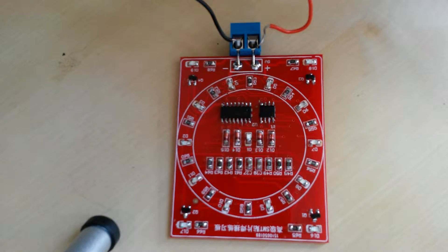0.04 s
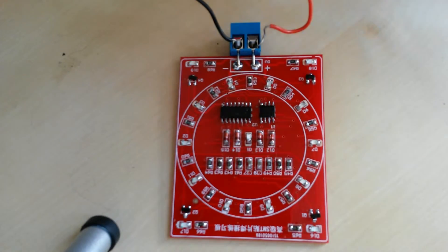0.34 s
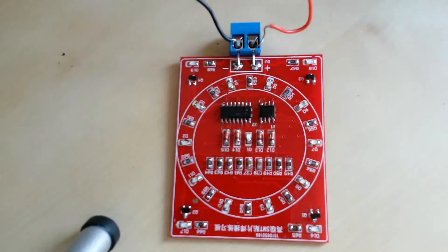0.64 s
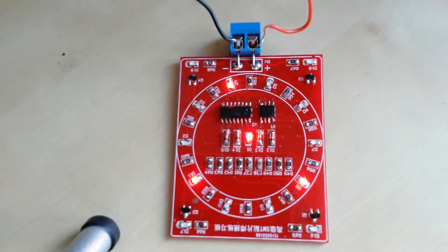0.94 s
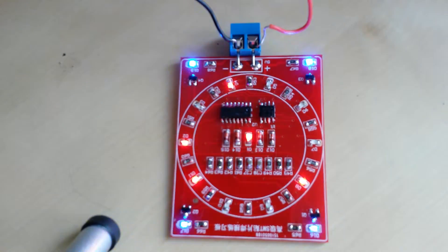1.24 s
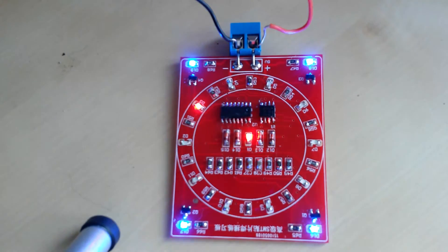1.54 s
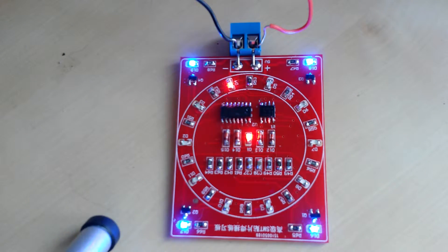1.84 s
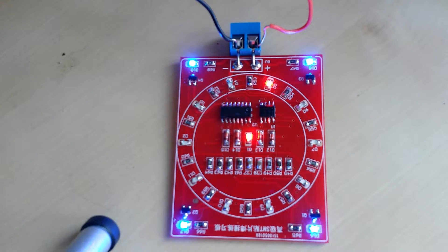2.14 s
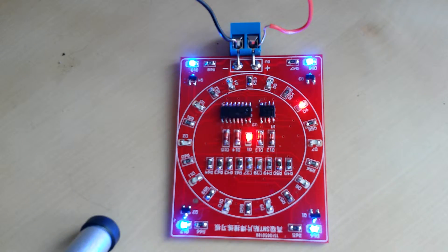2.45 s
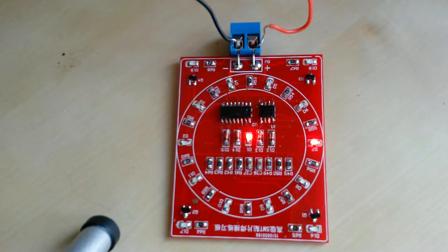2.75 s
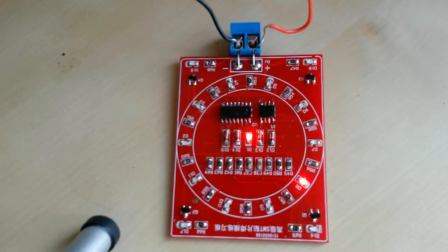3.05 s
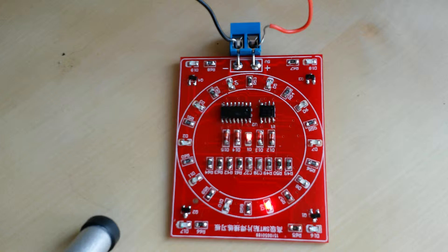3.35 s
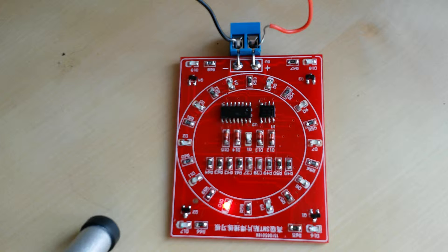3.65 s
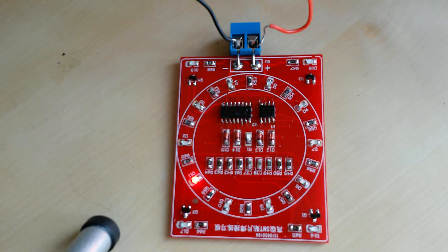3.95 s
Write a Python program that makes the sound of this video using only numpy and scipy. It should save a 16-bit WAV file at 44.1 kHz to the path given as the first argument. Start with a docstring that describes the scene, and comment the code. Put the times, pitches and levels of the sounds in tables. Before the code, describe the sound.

One sharp switch snap in a quiet room, then soft handling on a wooden desk.

```python
"""A wooden desk in a small quiet room. Close to the microphone a switch snaps loudly: its contacts
chatter, its housing rings and the room answers. Lighter clicks follow, soft bumps sound the desk's low
modes, and a hand or sleeve slides with a faint friction hiss and tiny ticks. Low mains hum and
microphone hiss lie beneath. The microphone rings near 7 kHz and overloads on the snap."""
import sys
import numpy as np
from scipy import signal
from scipy.fft import rfft, irfft
from scipy.io import wavfile

SR = 44100
rng = np.random.default_rng(int(sys.argv[2]) if len(sys.argv) > 2 else 0)


def store_pcm(level_fs):
    """Save levels as 16-bit WAV."""
    pcm = np.round(np.clip(level_fs, -1, 1) * 32767).astype(np.int16)
    wavfile.write(sys.argv[1], SR, np.atleast_2d(pcm).T)


N = 176400
TIME = np.arange(N) / SR
FREQS = np.maximum(np.arange(N // 2 + 1) * SR / N, 1)
SNAP_START_S = .0001

# Stereo image of every noise. Each row: frequency in Hz, left-right correlation.
STEREO_LIKENESS = [(60, 0), (280, .88), (650, 0.34), (1400, .3), (3000, 0.084), (15000, 0)]
# Room rumble and microphone hiss. Each row: frequency in Hz, relative level in dB.
ROOM_TONE_COLOUR = [(25, -0.5), (50, -2), (72, 3.5), (110, -7), (170, -8), (300, -14), (600, -16.5),
                    (1500, -20.5), (4500, -19), (6200, -19), (7400, -15.5), (9500, -21), (15000, -21)]
# Mains hum. Each row: frequency in Hz, rms level in dB before panning.
HUM_PARTIALS = [(100, -85.5), (200.3, -73.5), (300.4, -90), (400, -89)]
# Fader ride of the slide's hiss. Each row: time in seconds, level in dB before trim.
HISS_RIDE = [(.3, -71), (.5, -74), (.68, -69), (.98, -66), (1.17, -72), (1.38, -65), (1.52, -69),
             (1.59, -62.5), (1.7, -64.5), (1.85, -70), (1.94, -70), (2.05, -57.5), (2.14, -57),
             (2.25, -59.5), (2.54, -62), (2.66, -67.5), (2.82, -67), (3.15, -73), (4, -77)]
# Bright friction hiss. Each row: frequency in Hz, relative level in dB.
HISS_COLOUR = [(2000, -24), (4000, -16), (5800, -11.5), (6700, -5), (7400, 0), (8300, -5.5), (9600, -11),
               (12500, -13.5), (15000, -14.5)]
# The hiss leans left. Each row: frequency in Hz, left minus right in dB.
HISS_BALANCE = [(3000, 0.5), (7000, 0.5), (9000, 1.5), (14000, 3.5)]
# Fader ride of the rub. Each row: time in seconds, level in dB before trim.
RUB_RIDE = [(.75, -81.5), (1.36, -72.5), (1.48, -76.5), (1.6, -66), (1.7, -70), (1.92, -80), (2.24, -71),
            (2.55, -76), (2.77, -71.5), (3.15, -80.5), (4, -81.5)]
# Dull body of the slide. Each row: frequency in Hz, relative level in dB.
DULL_RUB_COLOUR = [(100, -8.5), (300, -3), (560, 0.5), (760, -7), (1050, -3), (1600, -9), (2300, -6.5),
                   (4000, -15)]
# The hand drags on the desk. Each row: time in seconds, level in dB.
DRAG_RIDE = [(2.5, -89), (2.58, -68.5), (2.72, -71.5), (2.77, -65.5), (2.82, -64.5), (2.89, -82)]
# Rumble of that drag. Each row: frequency in Hz, relative level in dB.
DRAG_RUMBLE_COLOUR = [(30, -13.5), (70, 0.5), (140, -2), (250, -13), (600, -24.5), (2000, -44.5),
                      (8000, -71)]
# Tiny catches in the slide. Each row: start in seconds, strike level in dB.
TICK_CUES = [(2.0169, -35.5), (2.0454, -31), (2.0503, -39), (2.0538, -35), (2.1265, -38), (2.281, -46)]
# Ping of a tick. Each row: frequency in Hz, gain in dB, 60 dB decay time in seconds.
TICK_RING = [(7900, -6, .003), (12500, -5, .0008)]
# Sizzle after a tick. Each row: frequency in Hz, relative level in dB.
TICK_TAIL_COLOUR = [(1000, -36), (4000, -28), (6000, -26), (7600, 7), (9500, 6), (15000, -20)]
# Soft bumps on the desk. Each row: start in seconds, push level in dB, contact time in seconds.
BUMP_CUES = [(0.641, -56, 0.0029), (0.65, -46, 0.0032), (2.008, -58.5, 0.0035), (2.031, -68, 0.015),
             (2.775, -55.5, 0.0045), (2.804, -59, 0.011), (3.356, -66, .008)]
# Low modes of the desk. Each row: frequency in Hz, gain in dB, 60 dB decay time in seconds.
DESK_RING = [(74.4, 5, 0.32), (104, -11, 0.19), (132.5, -1.5, 0.154), (155, -10.5, 0.26), (267, -3, 0.21),
             (376, 1, 0.27)]
# Lighter clicks. Each row: start in seconds, body level in dB, edge level in dB,
# 60 dB decay time in seconds, strike level of the ring in dB.
CLICK_CUES = [(.589, -59.5, -52.5, 0.095, -59.5), (1.302, -60, -74, 0.016, -79),
              (3.078, -64, -78, .025, -76)]
# Hollow body of a click. Each row: frequency in Hz, relative level in dB.
CLICK_BODY_COLOUR = [(150, 1), (400, 2), (580, 2), (820, -2), (1000, -7), (1600, -15), (2050, -7),
                     (2500, -22), (5000, -29), (15000, -43)]
# What a click sets ringing. Each row: frequency in Hz, gain in dB, 60 dB decay time in seconds.
CLICK_RING = [(397, -5.5, 0.75), (578, 0.5, 0.066), (680, -10, 0.45), (787, -7, 0.14), (2013, -12, 0.26)]
# The room's answer to the snap. Each row: frequency in Hz, relative level in dB.
REVERB_COLOUR = [(35, -34.5), (60, -19), (100, -28), (155, -17), (220, -29), (380, -19), (450, -27),
                 (640, -14), (820, -30.5), (1800, -27), (2750, -11.5), (3400, -14), (4300, -11.5),
                 (6100, -8.5), (7050, 3), (7900, -3.5), (9500, -13), (12500, -21), (15000, -29)]
# How fast the room dies away. Each row: frequency in Hz, 60 dB decay time in seconds.
REVERB_DECAY = [(100, 0.34), (300, .33), (700, .22), (1800, .22), (3000, 0.3), (7000, 0.2), (13000, .19)]
# Crack of the switch, also the clicks' edge. Each row: frequency in Hz, relative level in dB.
CRACK_COLOUR = [(40, -20), (100, -33), (250, -31.5), (380, -23.5), (630, -17), (920, -26), (1350, -18.5),
                (1750, -31), (2800, -20), (3900, -14), (5000, -12), (6200, -10), (7400, -1.5), (8600, -5.5),
                (10100, -15.5), (15000, -26)]
# Switch and housing modes. Each row: frequency in Hz, gain in dB, 60 dB decay time in seconds.
SWITCH_RING = [(158, -44.5, 0.29), (314, -42, 0.047), (387, -49, .3), (554, -28, .035), (606, -21, 0.046),
               (658, -26, 0.087), (2890, -40.5, .21), (3984, -33.5, .15), (5403, -34.5, .16),
               (6700, -32, 0.26), (7104, -27.5, .27), (7020, -29, 0.22), (10200, -40, .14),
               (12540, -42.5, 0.16)]
# The two capsules ring at different pitches. Each row: frequency in Hz, left minus right in dB.
CAPSULE_BALANCE = [(2500, 0.5), (5200, -1), (6200, -3), (6850, -4), (7450, -0.5), (8300, 5.5), (9400, 1),
                   (14000, 0)]


def from_db(db):
    """Decibels to gain."""
    return 10 ** (np.asarray(db) / 20)


def rms_one(x):
    """Scale to an rms of one."""
    return x / np.sqrt(np.mean(x ** 2) + 1e-20)


def at_hz(points, hz):
    """Read a table on a log-frequency axis."""
    freqs, values = np.transpose(points)
    return np.interp(np.log(hz), np.log(freqs), values)


def in_time(ride):
    """Read a fader ride at every sample."""
    return np.interp(TIME, *np.transpose(ride))


def pan(db):
    """Stereo gains for left minus right in dB: one value, or one per frequency."""
    return from_db(db * np.array([[.5], [-.5]]))


def drift(rate_hz):
    """Slow random wander, rms one."""
    return rms_one(irfft(rfft(rng.standard_normal(N)) / (1 + (FREQS / rate_hz) ** 2), N))


def ripple(spread_db, spacing_hz):
    """Random peaks and dips over frequency, as reflections make them; the bass stays even."""
    peaks = np.interp(FREQS / spacing_hz, np.arange(2000), rng.standard_normal(2000))
    return from_db(spread_db * np.minimum(FREQS / 1500, 1) * peaks)


def noise(colour):
    """Coloured stereo noise, rms one: narrow in the low mids, wide in the treble."""
    mid, side = rfft(rng.standard_normal((2, N)))
    alike = at_hz(STEREO_LIKENESS, FREQS)
    stereo = np.sqrt(1 + alike) * mid + np.sqrt(1 - alike) * side * [[1], [-1]]
    near_reflections = ripple(spread_db=3, spacing_hz=90.7)
    return rms_one(irfft(stereo * near_reflections * from_db(at_hz(colour, FREQS)), N))


def burst(start, t60, rise=1e-4, hold=0):
    """Envelope: straight attack, hold, exponential decay; times in seconds."""
    age = TIME - start
    attack = np.clip(age / rise, 0, 1)
    return attack * np.exp(-np.log(1000) * np.maximum(age - rise - hold, 0) / t60)


def ring(force, modes):
    """Decaying sines set off by a force, one resonator per mode."""
    out = 0
    for hz, db, t60 in modes:
        radius, angle = np.exp(-np.log(1000) / (t60 * SR)), 2 * np.pi * hz / SR
        feedback = [1, -2 * radius * np.cos(angle), radius * radius]
        out = out + signal.lfilter([0, from_db(db) * np.sin(angle)], feedback, force + 1e-18)
    return out


def low_cut(x, hz):
    """Roll off the lows at 12 dB per octave."""
    return signal.sosfilt(signal.butter(2, hz, "high", fs=SR, output="sos"), x)


def room_tone(floor_db=-68.5, waver_db=0.23):
    """The bed: room rumble, microphone hiss and a slightly wavering mains hum."""
    hum = 0
    for hz, db in HUM_PARTIALS:
        amplitude = np.sqrt(2) * from_db(db + waver_db * drift(rate_hz=3))
        hum = hum + amplitude * np.sin(2 * np.pi * (hz * TIME + rng.random()))
    return from_db(floor_db) * noise(ROOM_TONE_COLOUR) + pan(db=3) * hum


def hand_slide(hiss_trim_db=1.5, rub_trim_db=0.5):
    """Friction: a bright hiss, a dull rub, and a brief rumble where the hand drags on the desk."""
    flutter_db = 0.65 * drift(rate_hz=25)
    bright = irfft(rfft(noise(HISS_COLOUR)) * pan(at_hz(HISS_BALANCE, FREQS)), N)
    hiss = from_db(hiss_trim_db + in_time(HISS_RIDE) + flutter_db) * bright
    rub = from_db(rub_trim_db + in_time(RUB_RIDE) + flutter_db) * noise(DULL_RUB_COLOUR)
    rumble = from_db(in_time(DRAG_RIDE)) * noise(DRAG_RUMBLE_COLOUR)
    return hiss + rub + rumble


def slide_ticks(tail_db=-17):
    """The slide catches: needle-sharp ticks on the left, each with a faint diffuse tail."""
    strikes, tail_envelope = np.zeros(N), 0
    for start, db in TICK_CUES:
        strikes[int(start * SR)] = from_db(db)
        tail_envelope = tail_envelope + from_db(db + tail_db) * burst(start, t60=.03)
    pings = low_cut(ring(strikes, TICK_RING), hz=6000)   # so small a contact radiates only treble
    return pan(db=6) * pings + tail_envelope * noise(TICK_TAIL_COLOUR)


def desk_bumps():
    """Soft half-sine pushes into the desk's low modes; a longer contact gives a duller thud."""
    force = np.zeros(N)
    for start, db, contact_s in BUMP_CUES:
        push = np.sin(np.pi * np.clip((TIME - start) / contact_s, 0, 1))
        force += from_db(db) * push / push.sum()
    return pan(db=1) * low_cut(ring(force, DESK_RING), hz=62)   # the thud keeps little sub-bass


def light_clicks(rise_s=0.00195):
    """Small clacks in three layers: a hollow body, a bright edge and a short ring."""
    body, edge = noise(CLICK_BODY_COLOUR), noise(CRACK_COLOUR)
    strikes, clacks = np.zeros(N), 0
    for start, body_db, edge_db, t60, ring_db in CLICK_CUES:
        strikes[int((start + rise_s) * SR)] = from_db(ring_db)
        blend = from_db(body_db) * body + from_db(edge_db) * edge
        clacks = clacks + blend * burst(start, t60, rise=rise_s)
    return clacks + ring(strikes, CLICK_RING)


def snap_reverb(level_db=-17):
    """Dense reflections of the snap, full of narrow resonances, each octave dying at its own rate."""
    wash = rfft(noise(REVERB_COLOUR)) * ripple(spread_db=2, spacing_hz=34.56)
    tail = 0
    for hz in 31.25 * 2.0 ** np.arange(10):
        octave = np.maximum(1 - abs(np.log2(FREQS / hz)), 0)
        envelope = burst(SNAP_START_S, t60=at_hz(REVERB_DECAY, hz), rise=0.003)
        tail = tail + irfft(wash * octave, N) * envelope
    return from_db(level_db) * pan(db=-2.5) * tail


def switch_snap(crack_db=-3):
    """The main hit: a few milliseconds of hard contact chatter, and the ring of the housing."""
    strike = np.zeros(N)
    strike[int(SNAP_START_S * SR)] = 1
    crack = from_db(crack_db) * noise(CRACK_COLOUR) * burst(SNAP_START_S, t60=0.032, hold=.003)
    return crack + ring(strike, SWITCH_RING)


def scene():
    """The mix: the snap up front, small handling sounds after it, room tone underneath."""
    snap = switch_snap() + snap_reverb()
    handling = light_clicks() + desk_bumps() + hand_slide() + slide_ticks()
    return snap + handling + room_tone()


def record(dry, ceiling=0.58, top_stop_hz=15900):
    """The capsules colour left and right, the snap overloads the input, the top is cut."""
    hz = np.maximum(np.arange(N + 1) * SR / (2 * N), 1)
    coloured = irfft(rfft(dry, 2 * N) * pan(at_hz(CAPSULE_BALANCE, hz)))[:, :N]
    saturated = ceiling * np.tanh(coloured / ceiling)
    top_cut = signal.cheby2(20, 70, top_stop_hz, fs=SR, output="sos")
    return signal.sosfilt(top_cut, saturated)


dry = scene()
out = record(dry)
store_pcm(out)
```